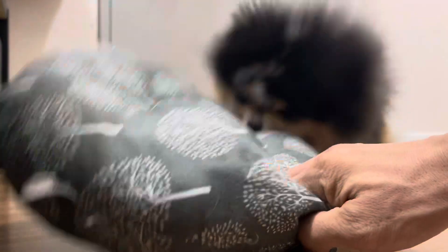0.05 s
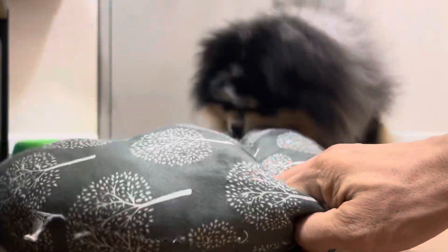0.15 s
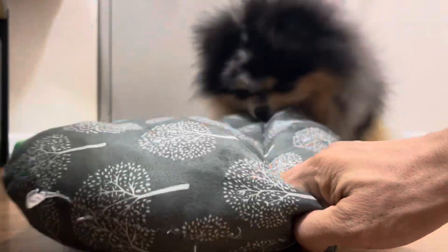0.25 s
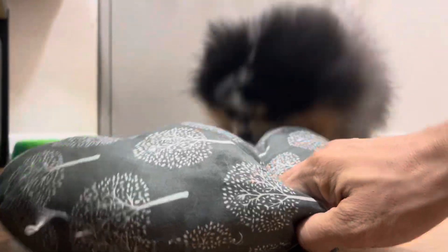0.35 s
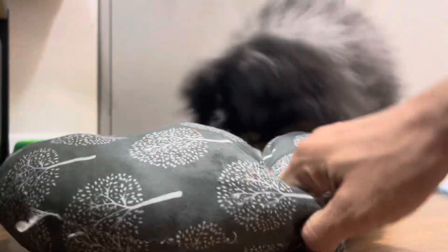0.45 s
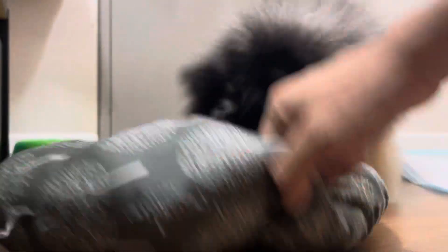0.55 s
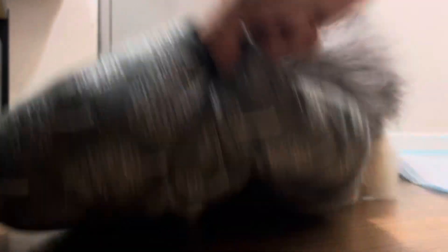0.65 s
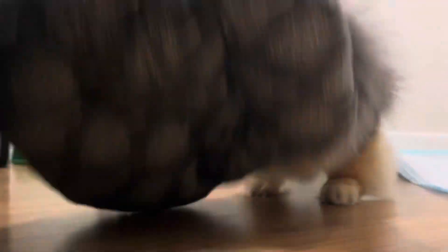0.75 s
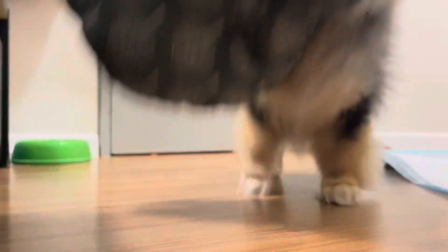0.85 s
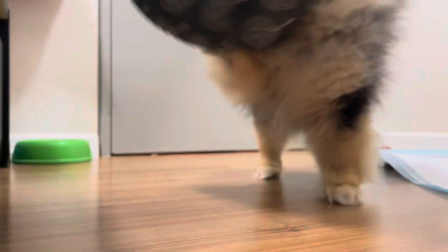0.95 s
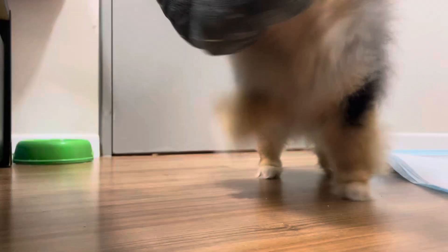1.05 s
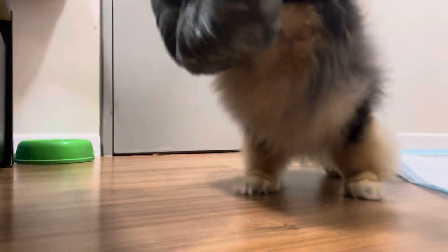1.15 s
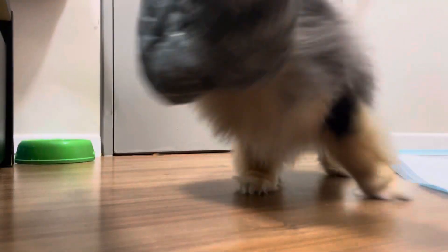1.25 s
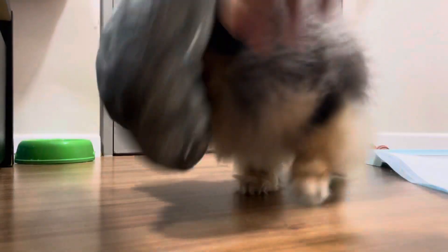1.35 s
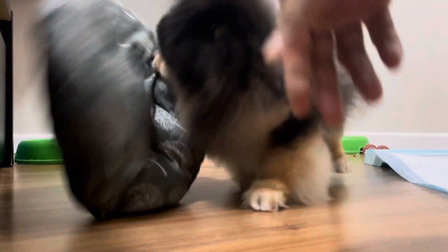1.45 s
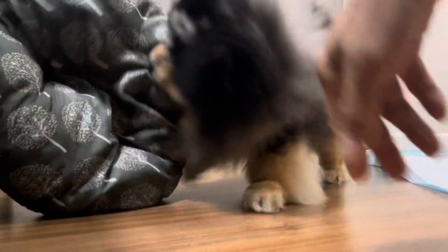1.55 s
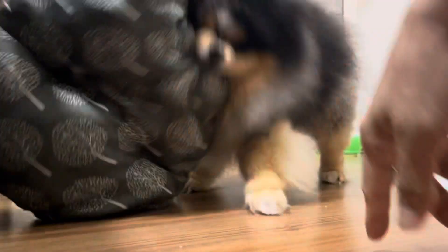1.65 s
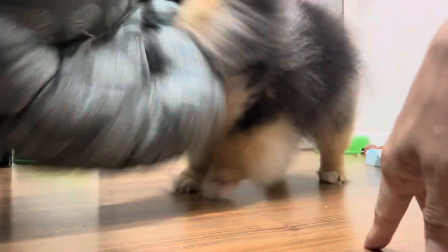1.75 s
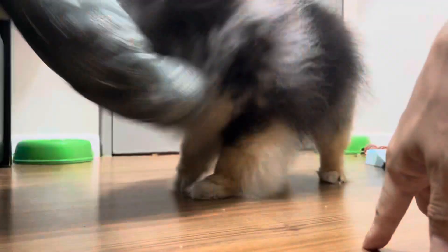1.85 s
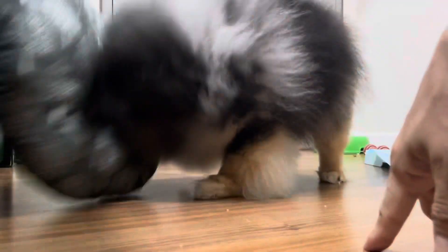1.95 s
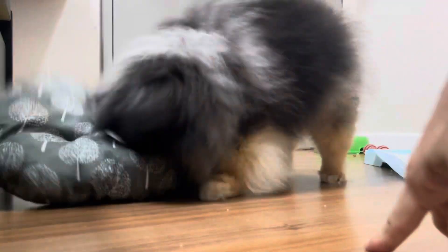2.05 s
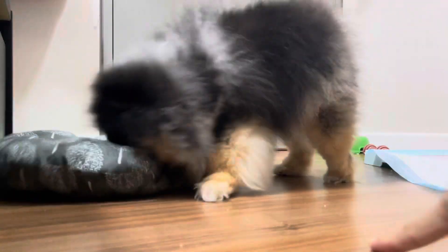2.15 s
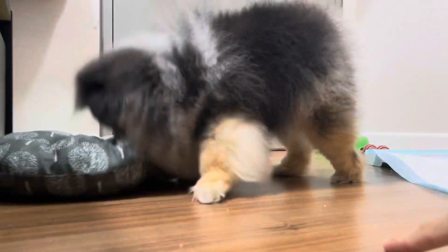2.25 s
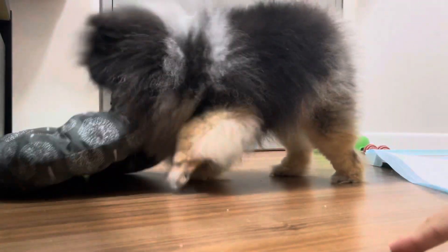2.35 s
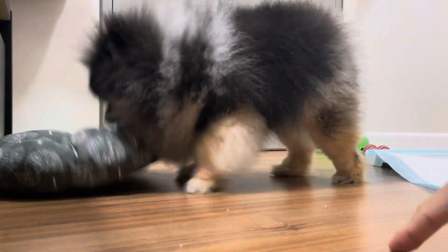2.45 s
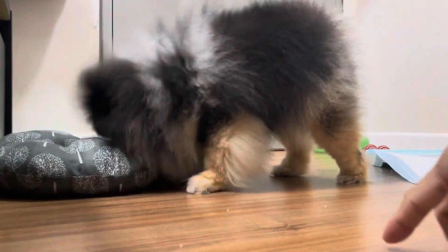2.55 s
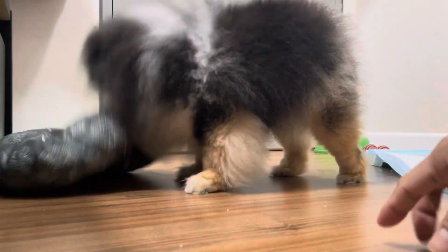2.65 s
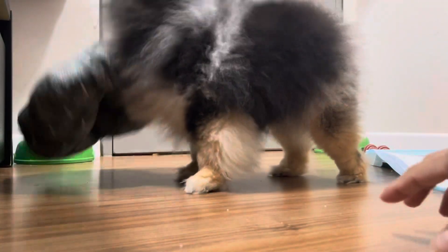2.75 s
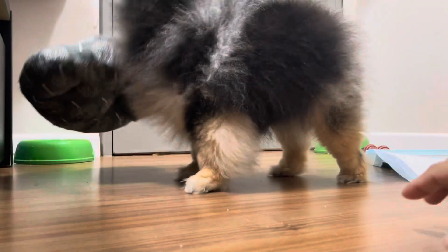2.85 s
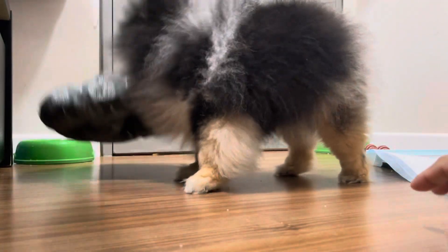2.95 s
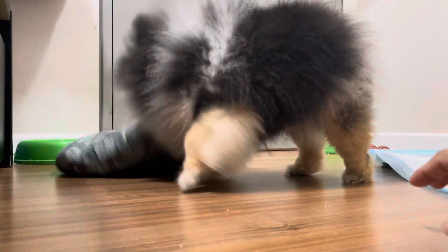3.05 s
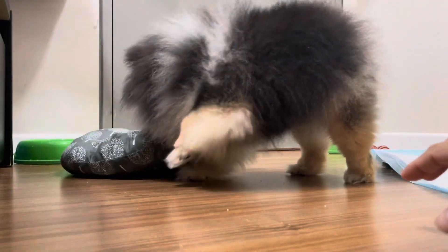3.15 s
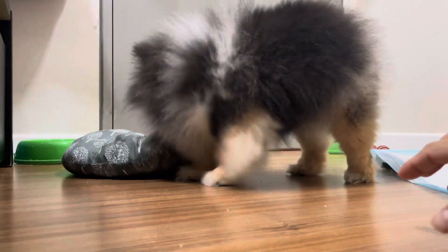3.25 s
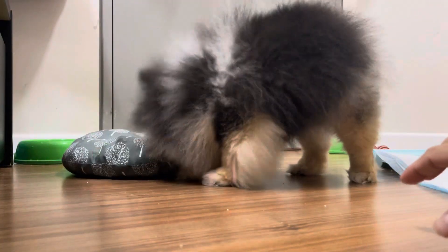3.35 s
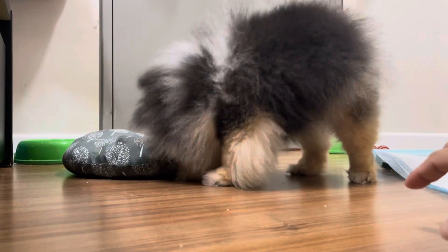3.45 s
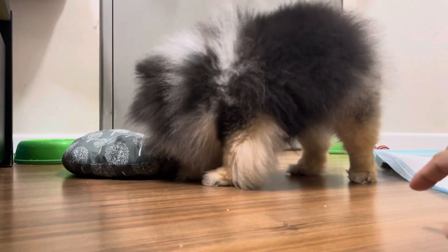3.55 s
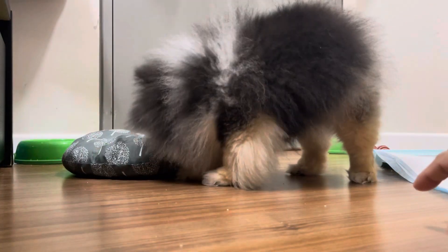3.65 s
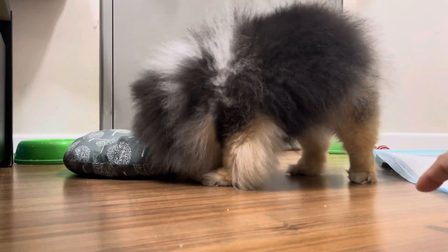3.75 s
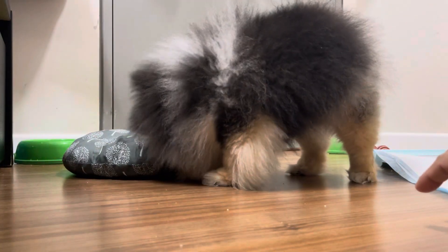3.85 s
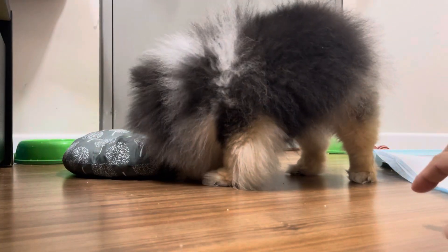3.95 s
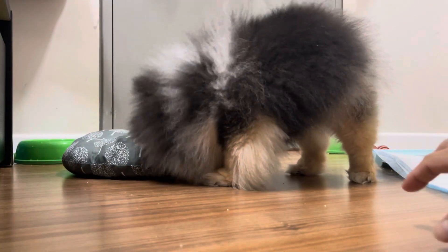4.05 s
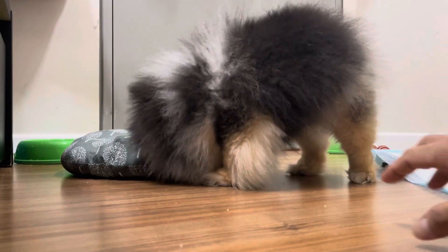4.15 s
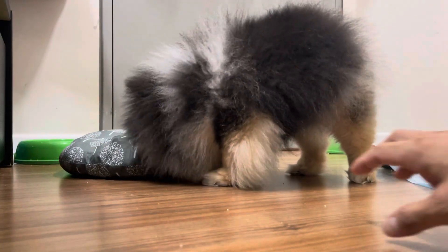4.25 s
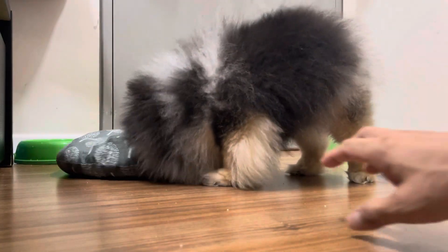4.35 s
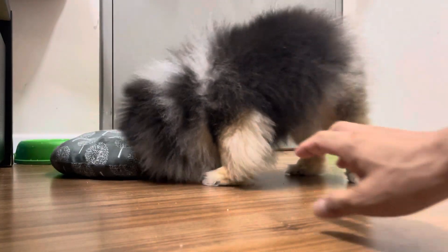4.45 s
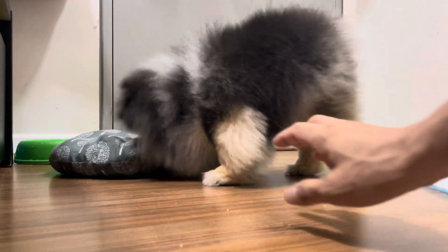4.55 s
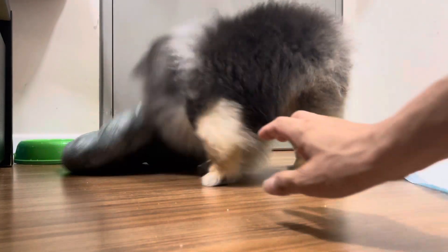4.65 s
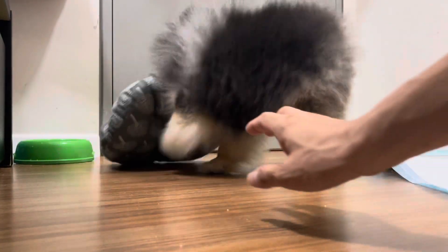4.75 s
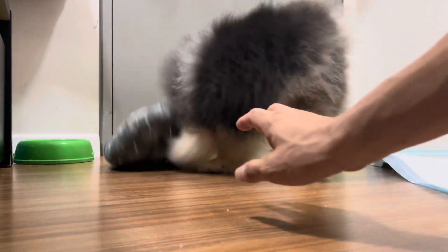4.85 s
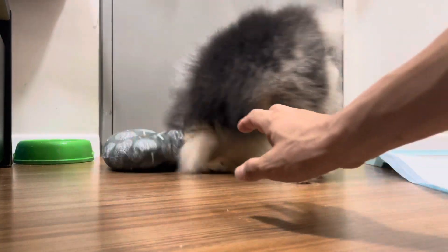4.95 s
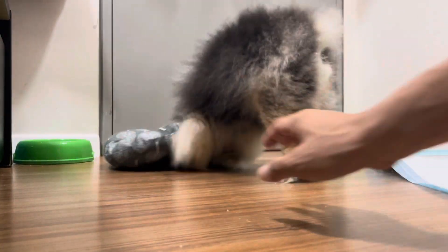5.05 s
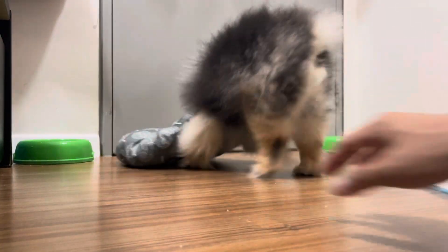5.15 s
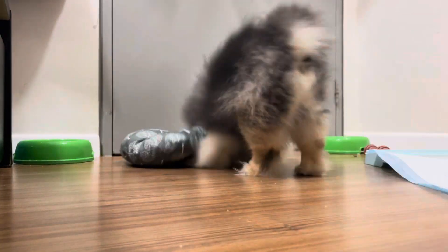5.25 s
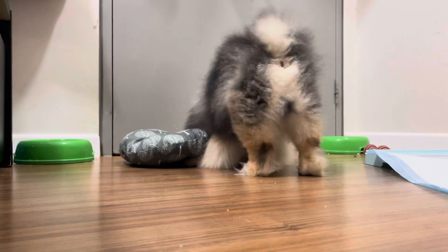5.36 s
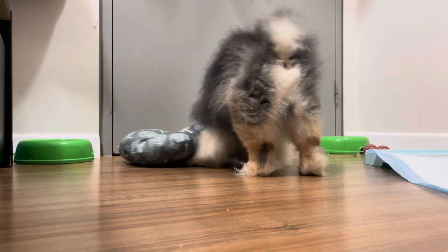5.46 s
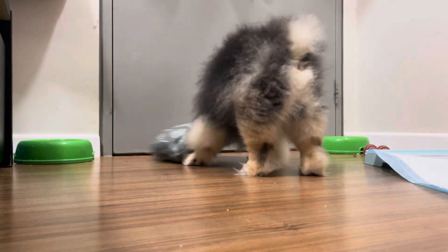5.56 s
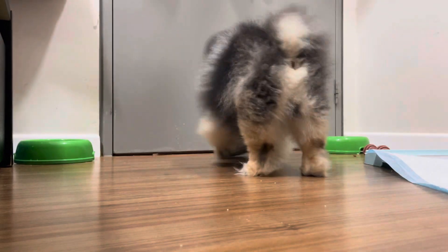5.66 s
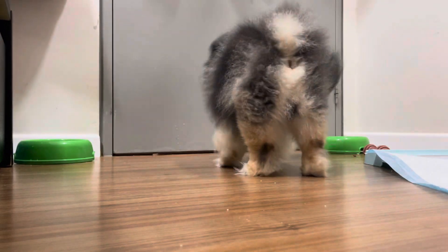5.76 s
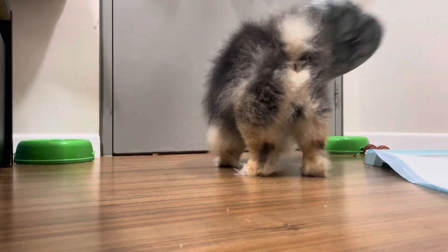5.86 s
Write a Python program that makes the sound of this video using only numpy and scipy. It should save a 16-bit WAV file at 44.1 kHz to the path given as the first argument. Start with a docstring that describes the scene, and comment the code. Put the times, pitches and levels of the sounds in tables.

```python
"""A small puppy tugs a cushion about on a wooden floor, close to a low microphone in a bare room.
Claws click in quick clusters: short noise bursts and damped plank modes, two strikes to a pawfall.
Skidding paws, dragged cloth and rustling fur are coloured noise; pads and dropped weight knock the boards.
The walls answer with brief decaying noise tails, over a low ventilation rumble with faint tones."""
import sys
import numpy as np
from scipy import signal
from scipy.fft import rfft, irfft, next_fast_len
from scipy.io import wavfile
from scipy.ndimage import map_coordinates

SR = 44100
rng = np.random.default_rng(int(sys.argv[2]) if len(sys.argv) > 2 else 0)


def unload_audio(sound):
    """Save the sound as a 16-bit wav file, at the path given as the first command line argument."""
    columns = np.transpose(np.atleast_2d(sound))
    # keep every value between -1 and 1, then stretch to whole-number steps
    steps = np.round(np.clip(columns, -1, 1) * 32767)
    wavfile.write(sys.argv[1], SR, steps.astype(np.int16))


N = 260631  # length in samples

# Levels in spectra and mode tables are relative; t60/s is the time to fall 60 dB.
# ventilation rumble, lifted by the room's low modes: f/Hz, level/dB
RUMBLE_SPECTRUM = [(22, -30.5), (40, -9), (55, -1), (68, 1.5), (79, -4.5), (98, -2.5), (125, -4),
                   (172, -0.5), (205, -7), (290, -10), (340, -15.5), (470, -18), (700, -43), (1300, -100)]
# faint air noise above the rumble: f/Hz, level/dB
AIR_SPECTRUM = [(250, -25.5), (480, 5.5), (900, 1.5), (1400, -18), (1850, -13), (2060, -4.5), (2250, -19.5),
                (2650, -0.5), (3200, -27), (5000, -39), (9000, -31), (12000, -27)]
# fan tones: f/Hz, rms level/dB ahead of the microphone ports
FAN_TONES = [(450, -69.5), (2050, -80.5)]
# bouts of tugging: start t/s, end t/s, rustle level/dB before its two colours are trimmed
TUGGING_BOUTS = [(0, 0.295, -55.5), (.5, .98, -68), (1.1, 2.532, -60), (4.318, 5.282, -66.5),
                 (5.49, 5.918, -59)]
# crisp hiss of fur and cover: f/Hz, level/dB
HISS_SPECTRUM = [(900, -40.5), (2300, -2), (3300, -2.5), (4400, -2), (5600, -7.5), (7000, -7.5), (9000, -5),
                 (11300, -19.5), (13000, -58.5)]
# dull rubbing of cloth: f/Hz, level/dB
RUB_SPECTRUM = [(250, -6.5), (600, -4.5), (780, -2.5), (960, 2.5), (1300, -5), (1700, -8.5), (2200, -9.5),
                (3200, -13.5), (7000, -46)]
# a tapped floorboard: f/Hz, level/dB, t60/s
BOARD_MODES = [(650, -14.5, 0.015), (928, -1.5, 0.025), (1054, 2, .015), (1186, -1.5, 0.014),
               (1436, -6.5, 0.019), (1708, -2.5, 0.014), (1977, -10, 0.034), (2580, -1.5, 0.0051)]
# noise of a claw's body: f/Hz, level/dB
CLAW_BODY_SPECTRUM = [(1200, -28.5), (2400, -11.5), (3200, -3), (4600, -0.5), (5500, -5.5), (6500, -7.5),
                      (7800, -22.5), (12000, -48.5)]
# a paw skids on its claws: middle t/s, length scale/s, level/dB, scrape f/Hz, fizz relative level/dB
SKID_STROKES = [(0.113, 0.027, -41, 3700, -7.5), (0.163, 0.037, -44, 3600, -3),
                (0.229, .032, -44.5, 3700, -4), (0.562, 0.068, -59, 4400, -5),
                (0.723, 0.079, -45.5, 3860, -11), (0.949, .05, -61, 3870, -6),
                (1.045, 0.072, -44, 3720, -7), (1.161, 0.029, -40, 3380, -4.5),
                (1.26, 0.024, -42.5, 3950, -7), (1.397, 0.076, -47.5, 4110, -4),
                (1.677, 0.039, -42, 4560, 0), (1.717, 0.064, -42, 4400, 2), (1.84, 0.012, -43, 4600, -1.5),
                (2.028, .038, -47, 4370, -7), (2.29, 0.017, -47, 4580, 0.5), (2.971, 0.066, -54, 3410, -13),
                (4.565, 0.053, -45.5, 3640, -9.5), (4.785, 0.054, -57, 4300, -6.5),
                (5.181, 0.033, -47.5, 4000, -7), (5.271, 0.064, -59.5, 3770, 1),
                (5.825, 0.038, -55, 3750, -7)]
# a claw dragged on wood: f/Hz, level/dB
SCRAPE_SPECTRUM = [(900, -35.5), (2200, -3.5), (3000, 1.5), (4600, 2), (6500, -3), (9000, -16)]
# fur and cloth on varnish: f/Hz, level/dB
FIZZ_SPECTRUM = [(3000, -23.5), (5500, -3.5), (6600, -4), (9000, -1), (11300, -1.5), (13000, -27.5)]
# a paw sets down two claws: t/s, level/dB before each part's trim, ring f/Hz,
# board knock relative level/dB, second claw's lag/s, second claw's relative level/dB
PAWFALL_EVENTS = [(0.1103, -38, 3950, -9, .004, -2), (0.1523, -34, 3680, -11.5, .004, -18),
                  (0.2922, -20.5, 4310, -22, 0.0026, -8.5), (0.8175, -31, 4260, -18, 0.0015, -18),
                  (1.0643, -16.5, 4720, -11.5, 0.0028, -2), (1.3481, -26, 4030, -16, .0088, 2.5),
                  (1.4868, -28.5, 4200, -17, 0.0017, -14), (1.5667, -23.5, 4874, -14.5, .004, -1.5),
                  (1.7969, -34, 4240, -18.5, .0067, 3.5), (1.996, -28, 4930, -17.5, 0.0035, -8),
                  (2.423, -29, 4130, -14, 0.0061, -2), (3.2132, -29, 4610, -10.5, 0.011, -1),
                  (4.3124, -45.5, 4120, -24, 0.002, -7.5), (4.4339, -37.5, 4420, -11, 0.01, 1.5),
                  (4.652, -42, 4470, -32, .003, -1), (4.831, -26, 4440, -15.5, 0.0047, 0),
                  (5.2088, -32.5, 3680, -12, 0.0032, -17.5), (5.6582, -26, 5080, -13.5, 0.0075, 1.5),
                  (5.871, -32.5, 4300, -20, .0053, 1)]
# the hard floor surface under a claw: f/Hz, level/dB, t60/s
PLANK_MODES = [(2897, -7, 0.039), (3307, -7.5, 0.0088), (3757, -1, 0.026), (4830, -1.5, 0.011),
               (5260, -8, 0.003), (6300, -9.5, 0.04), (6520, -2.5, 0.013), (7480, -10.5, 0.01)]
# noise of a claw's sharp tip: f/Hz, level/dB
CLAW_TIP_SPECTRUM = [(4000, -30.5), (6200, -9.5), (7600, 3.5), (9300, 0.5), (11200, 3), (12500, -18.5),
                     (15000, -15)]
# the paw's weight behind a claw: f/Hz, level/dB
PAW_WEIGHT_SPECTRUM = [(200, -7.5), (450, -1.5), (750, -3), (1500, -3), (3000, -23.5)]
# puppy or cushion drops its weight: t/s, air push level/dB before trim, floor boom level/dB
THUD_EVENTS = [(0.132, -41, -63), (0.3464, -45, -42), (0.362, -51, -41.5), (1.488, -44, -48),
               (1.51, -37, -50), (1.544, -40, -59.5), (1.895, -53, -49.5), (1.974, -37.5, -48.5),
               (2.094, -37, -44.5), (2.699, -59.5, -48.5), (3.025, -54, -45.5)]
# the floor bending under a weight: f/Hz, width/Hz, level/dB
JOIST_RESONANCES = [(160, 55, 0.5), (226, 57, 2.5), (405, 590, -14)]
# a soft pad taps a board: t/s, level/dB before each part's trim, pitch f/Hz
PAD_TAPS = [(0.3463, -41, 1060), (0.362, -41, 1170), (0.6122, -43, 968), (0.754, -52, 1100),
            (1.488, -46, 537), (1.545, -45, 850), (1.675, -39.5, 880), (2.088, -51.5, 600),
            (2.1182, -52, 580), (2.148, -36.5, 917), (3.027, -53.5, 513), (3.289, -54.5, 860),
            (3.695, -55, 877), (4.0496, -59, 892), (4.361, -48.5, 870), (5.0329, -44, 674),
            (5.041, -43.5, 620), (5.581, -52, 720)]
# the cushion drags over the boards: middle t/s, length scale/s, level/dB
DRAG_STROKES = [(0.787, 0.066, -51), (1.664, 0.048, -47), (2.295, 0.064, -49), (2.623, .085, -50),
                (3.034, 0.046, -58), (3.384, 0.045, -61), (3.932, 0.098, -62.5), (4.399, 0.088, -51.5),
                (4.636, 0.06, -56.5), (5.074, 0.066, -54), (5.562, 0.13, -57)]
# how long the walls ring: f/Hz, t60/s
WALL_DECAY = [(150, 1), (1000, 0.087), (4000, 0.26), (11000, 0.21)]
# colour of the walls' answer: f/Hz, level/dB
WALL_COLOUR = [(150, -7), (1000, -3), (2500, -2), (4500, -7.5), (8500, 4), (12000, 4)]
# the puppy moves to the left and back: t/s, left minus right level/dB
PUPPY_POSITION = [(1.45, 1), (1.602, 2.5), (4.8, 1), (5.2, 1.5)]
# how far the left microphone port leads: f/Hz, phase/radians
PORT_PHASE_LEAD = [(600, 0), (700, -1.9), (1100, -.9), (1400, -.9), (1700, 0), (2200, .1), (2900, 1.5),
                   (4200, .9), (5500, .9), (6400, .1), (7500, 1), (8500, .2), (10250, -3.14), (12000, -6.3)]
# left port against right: f/Hz, left minus right level/dB
PORT_LEVEL_TILT = [(60, 0.3), (150, 0.5), (450, 4.5), (800, 2.5), (1400, 0.5), (3600, 1.5), (4600, 4.5),
                   (7000, 5.5), (8200, -0.5), (12000, -0.5)]

STIR_S, SETTLE_S, REST_DB = 0.034, 0.16, -76.5  # rustle: rise, decay constant, level at rest before trim
TOP_HZ = 12500  # next to nothing is heard above this


def amp(db):
    """Decibels to gain."""
    return 10 ** (np.asarray(db) / 20)


def unit(x):
    """Bring x to rms 1."""
    return x / np.sqrt(np.mean(x ** 2) + 1e-20)


def along(points, hz):
    """Read (f/Hz, value) points on a log frequency axis."""
    f, value = np.transpose(points)
    return np.interp(np.log(hz + 1), np.log(f), value)


def filtered(x, response):
    """Multiply the spectrum of x by a complex response of frequency."""
    n = x.shape[-1]
    padded = next_fast_len(n + 8192)
    hz = np.fft.rfftfreq(padded, 1 / SR)
    return irfft(rfft(x, padded) * response(hz), padded)[..., :n]


def coloured(x, spectrum):
    """Shape x by (f/Hz, level/dB) points."""
    return filtered(x, lambda hz: amp(along(spectrum, hz)))


def resonate(x, modes):
    """Pass x through parallel (f/Hz, width/Hz, level/dB) resonances of alternating sign."""
    def response(f):
        total = 0
        for k, (centre, width, db) in enumerate(modes):
            damping = 1j * f * width
            total = total + (-1) ** k * amp(db) * damping / (centre ** 2 - f ** 2 + damping)
        return total
    return filtered(x, response)


def wobble(rate):
    """A smooth random curve with rate knots a second."""
    knots = rng.standard_normal(int(N * rate / SR) + 4)
    return map_coordinates(knots, [np.arange(N) * rate / SR])


def add(track, s, sound):
    """Mix a sound into the track at s seconds."""
    start = max(round(s * SR), 0)
    track[start:start + len(sound)] += sound[:max(N - start, 0)]


def sized(x, db, span):
    """Give x the energy of a sound at that level lasting span seconds."""
    return x * amp(db) * np.sqrt(span * SR / np.sum(x ** 2))


def burst(rise, t60):
    """The rough force of one contact: noise that builds up and dies away."""
    t = np.arange(SR // 6) / SR
    return rng.standard_normal(len(t)) * (1 - np.exp(-t / rise)) * amp(-60 * t / t60)


def ringing(modes, rise, scatter_db):
    """Damped (f/Hz, level/dB, t60/s) modes with random phases and scattered strengths."""
    t = np.arange(SR // 6) / SR
    hz, db, t60 = np.transpose(modes)[:, :, None]
    db = db + scatter_db * rng.standard_normal(hz.shape)
    phase = 2 * np.pi * rng.random(hz.shape)
    tones = amp(db - 60 * t / t60) * np.sin(2 * np.pi * hz * t + phase)
    return tones.sum(0) * (1 - np.exp(-t / rise))


def friction(spectrum, density, grain_db, flutter_db):
    """Tiny catches (density a second) of claw and fibre on a smooth hiss; the pressure flutters."""
    catches = (rng.random(N) < density / SR) * rng.standard_normal(N)
    force = rng.standard_normal(N) + amp(grain_db) * unit(catches)
    return unit(coloured(force, spectrum) * amp(flutter_db * wobble(90)))


def stroke(middle, length, rise=0.64, fall=0.59):
    """The samples of one sliding stroke and its pressure there: it grips, runs and lifts."""
    travel = (np.arange(N) / SR - middle) / length
    near = abs(travel) < 2
    travel = travel[near]
    fade = np.where(travel < 0, (travel / rise) ** 4, (travel / fall) ** 2)
    return near, np.exp(-fade)


def boom():
    """The floor bends under a soft blow: a noise burst through the joist resonances."""
    blow = burst(rise=0.00091, t60=0.027)
    return coloured(resonate(blow, JOIST_RESONANCES), [(450, 7), (1500, -40)])


def ventilation(rumble_db=-50.0, air_db=-65, rumble_side_db=-19, air_side_db=-5):
    """A steady rumble, nearly alike at both ports, with faint air noise and phase-wandering tones."""
    def bed(spectrum, side_db):
        mid, side = coloured(rng.standard_normal((2, N)), spectrum)
        return unit(mid + amp(side_db) * np.array([side, -side]))

    t = np.arange(N) / SR
    rumble = amp(rumble_db) * bed(RUMBLE_SPECTRUM, rumble_side_db)
    air = amp(air_db) * bed(AIR_SPECTRUM, air_side_db)
    hum = np.zeros(N)
    for hz, db in FAN_TONES:
        hum += np.sqrt(2) * amp(db) * np.sin(2 * np.pi * hz * t + 0.63 * wobble(8.1))
    return rumble + air + hum


def rustle(crisp_db=-5.0, dull_db=-4.5, restless_db=3):
    """Fur and cushion cover rub through each bout of tugging, then settle without quite keeping still."""
    t = np.arange(N) / SR
    level = np.full(N, amp(REST_DB))
    for start, end, db in TUGGING_BOUTS:
        stir = np.clip((t - start) / STIR_S, 0, 1)
        settle = np.exp(-np.maximum(t - end, 0) / SETTLE_S)
        level += amp(db) * stir * settle
    crisp = amp(crisp_db) * friction(HISS_SPECTRUM, density=370, grain_db=-4, flutter_db=3.5)
    dull = amp(dull_db) * friction(RUB_SPECTRUM, density=110, grain_db=-4.5, flutter_db=4.0)
    return level * (crisp + dull) * amp(restless_db * wobble(11))


def ticks(rate=14, size_db=-60, spread_db=2.0, crisp_db=-5):
    """In each bout claws and seams touch the boards lightly at random moments, rate a second."""
    out = np.zeros(N)
    for start, end, _ in TUGGING_BOUTS:
        count = max(round(rate * (end - start)), 0)
        for s in rng.uniform(start, end, count):
            db = size_db + spread_db * rng.standard_normal()
            wood = ringing(BOARD_MODES, rise=.0005, scatter_db=4.5)
            crisp = coloured(burst(rise=.0003, t60=.012), CLAW_BODY_SPECTRUM)
            add(out, s, sized(wood, db, span=.006))
            add(out, s, sized(crisp, db + crisp_db, span=.006))
    return out


def skids(scrape_db=0, fizz_db=0, rub_db=-13, scrape_width_hz=1700):
    """A skidding paw scrapes at its own pitch, fizzes on the varnish and faintly rubs the board."""
    grit = friction(SCRAPE_SPECTRUM, density=890, grain_db=-1.5, flutter_db=0.0)
    fizz = friction(FIZZ_SPECTRUM, density=4300, grain_db=0, flutter_db=1.5)
    rub = friction(RUB_SPECTRUM, density=330, grain_db=3.5, flutter_db=-1.0)
    out = np.zeros(N)
    for s, length, db, hz, fizziness in SKID_STROKES:
        near, pressure = stroke(s, length)
        scrape = resonate(grit[near], [(hz, scrape_width_hz, 0)])
        parts = (scrape, scrape_db), (fizz[near], fizziness + fizz_db), (rub[near], rub_db)
        for part, level in parts:
            out[near] += pressure * amp(db + level) * unit(part)
    return out


def claws(ring_db=-7, plank_db=-8.0, body_db=-3, tip_db=-8, knock_db=0.0, onset_db=-19, weight_db=-7):
    """Each claw strikes: ring, sharp tip, body, plank ring, board knock and paw weight."""
    strikes = []
    for s, db, hz, knock, lag, second_db in PAWFALL_EVENTS:
        strikes += [(s, db, hz, knock), (s + lag, db + second_db, hz, knock)]
    out = np.zeros(N)
    for s, db, hz, knock in strikes:
        ring = ringing([(hz, 0, .011)], rise=.0008, scatter_db=0)
        # the plank's pitch differs from strike to strike
        spot = np.array([np.exp(0.04 * rng.standard_normal()), 1, 1])
        plank = ringing(PLANK_MODES * spot, rise=0.00009, scatter_db=-1.0)
        body = coloured(burst(rise=0.00034, t60=0.035), CLAW_BODY_SPECTRUM)
        tip = coloured(burst(rise=0.00061, t60=0.031), CLAW_TIP_SPECTRUM)
        for part, level in (ring, ring_db), (plank, plank_db), (body, body_db), (tip, tip_db):
            add(out, s, sized(part, db + level, span=0.0036))
        # a soft noise onset leads into the click
        onset = coloured(burst(rise=.002, t60=0.0077), CLAW_BODY_SPECTRUM)
        add(out, s - .0018, sized(onset, db + onset_db, span=0.0016))
        wood = ringing(BOARD_MODES, rise=0.00038, scatter_db=-4.5)
        # slow bending waves arrive later
        add(out, s + 0.00062, sized(wood, db + knock + knock_db, span=0.0047))
        weight = coloured(burst(rise=.0008, t60=.025), PAW_WEIGHT_SPECTRUM)
        add(out, s + .001, sized(weight, db + knock + weight_db, span=.006))
    return out


def thuds(push_db=-1, push_hz=60, boom_db=0):
    """A dropping weight pushes the air in a damped low tone and bends the floor."""
    out = np.zeros(N)
    for s, push_level, boom_level in THUD_EVENTS:
        push = ringing([(push_hz, 0, .06)], rise=0.0037, scatter_db=0)
        add(out, s, sized(push, push_level + push_db, span=0.019))
        add(out, s, sized(boom(), boom_level + boom_db, span=0.02))
    return out


def pads(tap_db=-1.5, wood_db=-6, contact_db=-11, boom_db=-10):
    """Soft landings: a dull tap pitched by the spot that is hit, with the floor's boom."""
    out = np.zeros(N)
    for s, db, hz in PAD_TAPS:
        note = ringing([(hz, 0, .014)], rise=0.00069, scatter_db=0)
        wood = ringing(BOARD_MODES, rise=0.00079, scatter_db=5.5)
        contact = coloured(burst(rise=0.00019, t60=.015), [(2800, 0), (6000, -16.5)])
        for part, level in (note, tap_db), (wood, wood_db), (contact, contact_db):
            add(out, s, sized(part, db + level, span=0.0088))
        add(out, s, sized(boom(), db + boom_db, span=0.052))
    return out


def drags(rub_db=0.0, scratch_db=-7, fizz_db=-11, scratch_hz=2850, scratch_width_hz=1700):
    """Cloth rubs the boards dully, its weave scratching and fizzing a little; every drag has one colour."""
    rub = friction(RUB_SPECTRUM, density=370, grain_db=-0.5, flutter_db=2.0)
    weave = friction(SCRAPE_SPECTRUM, density=250, grain_db=-15.5, flutter_db=8.5)
    scratch = unit(resonate(weave, [(scratch_hz, scratch_width_hz, 0)]))
    fizz = friction(FIZZ_SPECTRUM, density=1800, grain_db=2, flutter_db=6.5)
    cloth = amp(rub_db) * rub + amp(scratch_db) * scratch + amp(fizz_db) * fizz
    out = np.zeros(N)
    for s, length, db in DRAG_STROKES:
        near, pressure = stroke(s, length)
        out[near] += amp(db) * pressure * cloth[near]
    return out


def room(x, build=0.0092, apart_db=-4, ceiling_s=0.017, ceiling_db=3, step=.4):
    """The walls' answer builds up, swells as the ceiling replies, and dies; its tail changes every step s."""
    out, time = np.zeros((2, N)), np.arange(N) / SR
    # long waves reach both ports alike
    side_colour = [(120, -23.0), (700, 13.5), (3000, 3.5), (7000, 3), (8500, -8.5)]
    for centre in np.arange(0, N / SR + step, step):
        hz, t, cells = signal.stft(rng.standard_normal((2, SR // 2)), SR, nperseg=256)
        decay = amp(-60 * t / along(WALL_DECAY, hz)[:, None])
        tails = signal.istft(cells * decay, SR, nperseg=256)[1]
        age = np.arange(tails.shape[1]) / SR
        swell = amp(ceiling_db * np.exp(-((age - ceiling_s) / 0.0015) ** 2))
        mid, side = tails * swell * (1 - np.exp(-(age / build) ** 2))
        side = coloured(side, side_colour)
        pair = mid + amp(apart_db) * np.array([side, -side])
        pair = pair / np.linalg.norm(pair[0])
        # neighbouring tails crossfade
        part = x * np.maximum(1 - abs(time - centre) / step, 0)
        out += signal.fftconvolve(part[None], pair, axes=1)[:, :N]
    return coloured(out, WALL_COLOUR)


def ports(x):
    """The microphone's body sets level and phase between its two ports, differently at each frequency."""
    sides = np.array([[.5], [-.5]])

    def response(hz):
        level = amp(sides * along(PORT_LEVEL_TILT, hz))
        return level * np.exp(1j * sides * along(PORT_PHASE_LEAD, hz))
    return filtered(x, response)


def scene(room_db=-4.0):
    """The puppy and its cushion move about close by in the room, over the ventilation."""
    puppy = rustle() + ticks() + skids() + claws() + thuds() + pads() + drags()
    left_right_db = np.interp(np.arange(N) / SR, *np.transpose(PUPPY_POSITION))
    pan = amp(np.array([[.5], [-.5]]) * left_right_db)
    return ports(pan * puppy + amp(room_db) * room(puppy) + ventilation())


def record(dry, low_cut_hz=38):
    """Deep bass is thinned and the top ends steeply."""
    def response(hz):
        bass = hz ** 2 / np.sqrt(hz ** 4 + low_cut_hz ** 4)
        band = 1 / np.sqrt(1 + (hz / TOP_HZ) ** 80)
        return bass * band
    return filtered(dry, response)


dry = scene()
out = record(dry)
unload_audio(out)
```